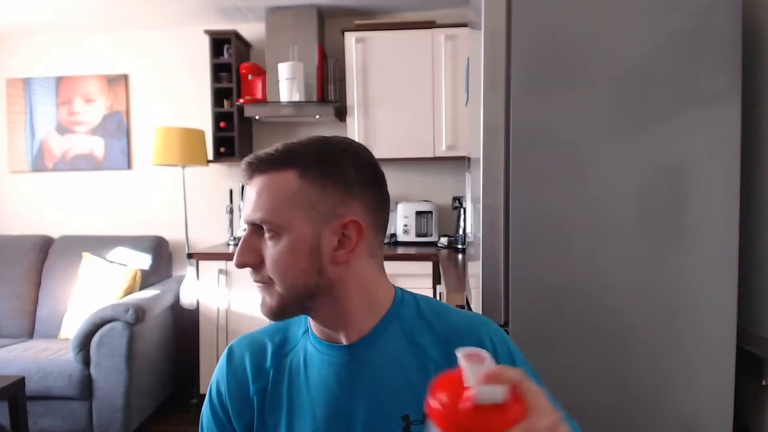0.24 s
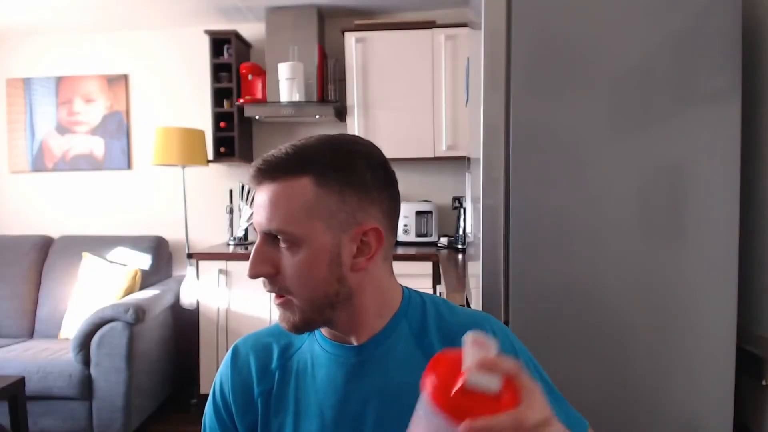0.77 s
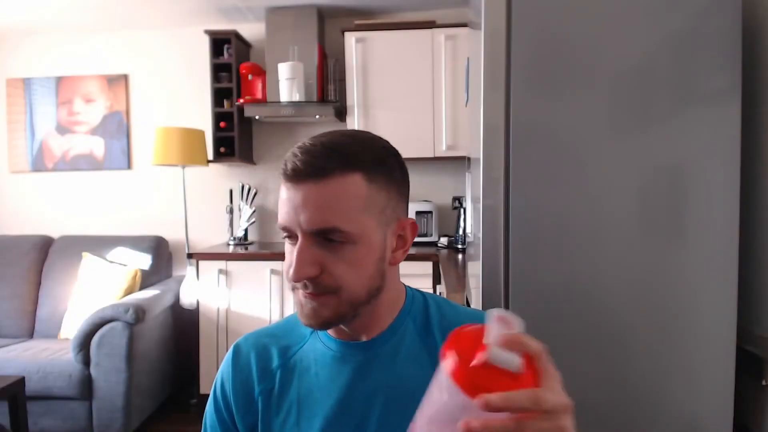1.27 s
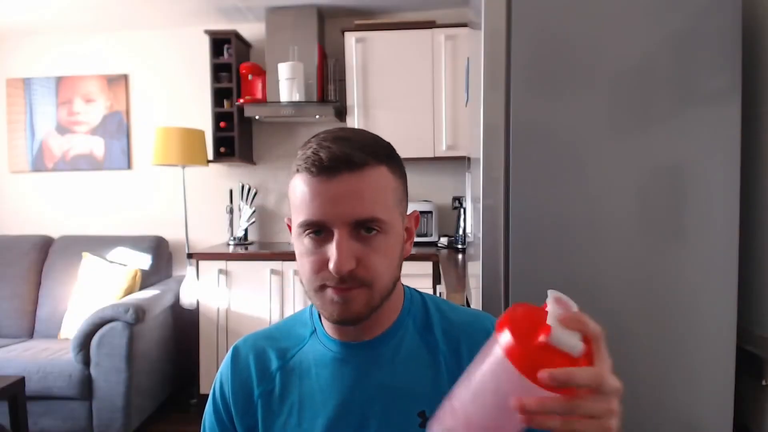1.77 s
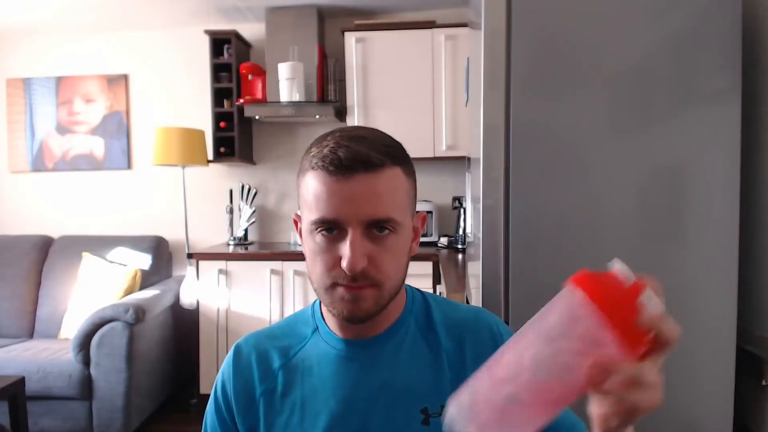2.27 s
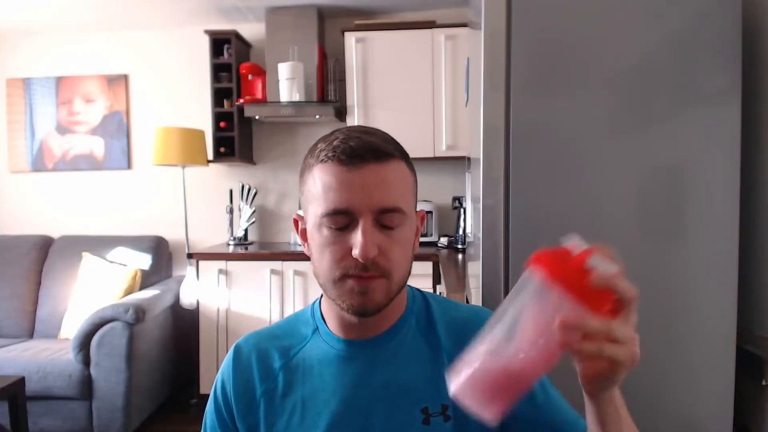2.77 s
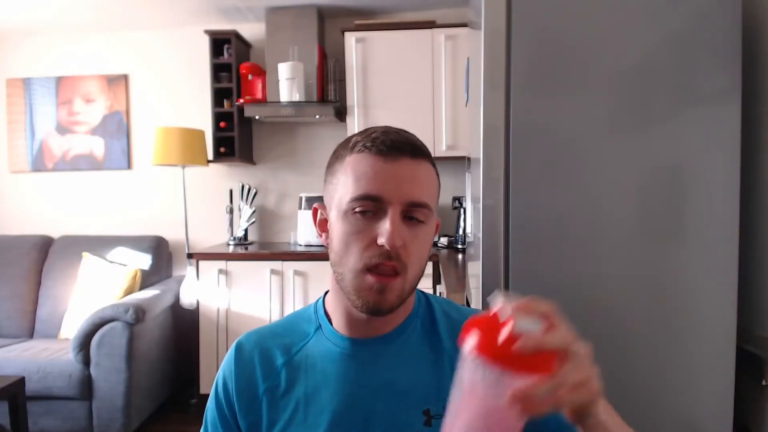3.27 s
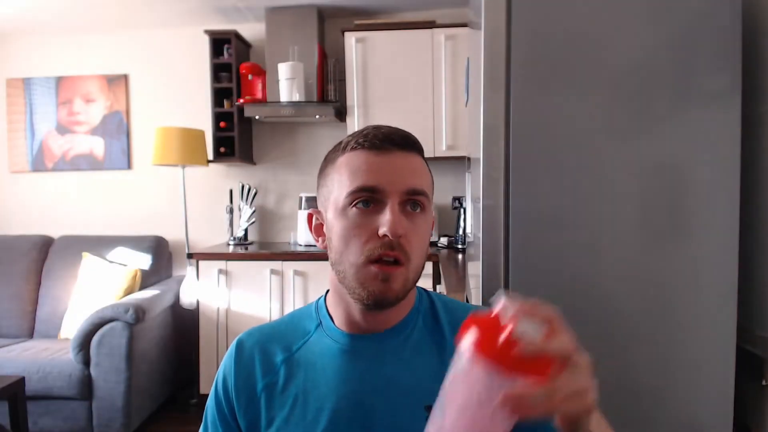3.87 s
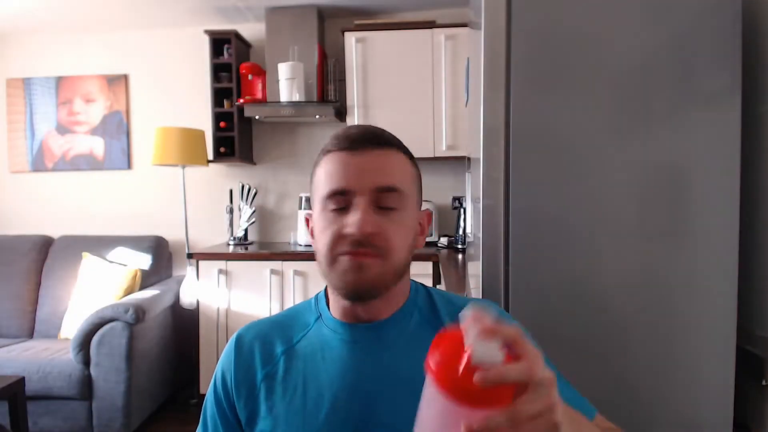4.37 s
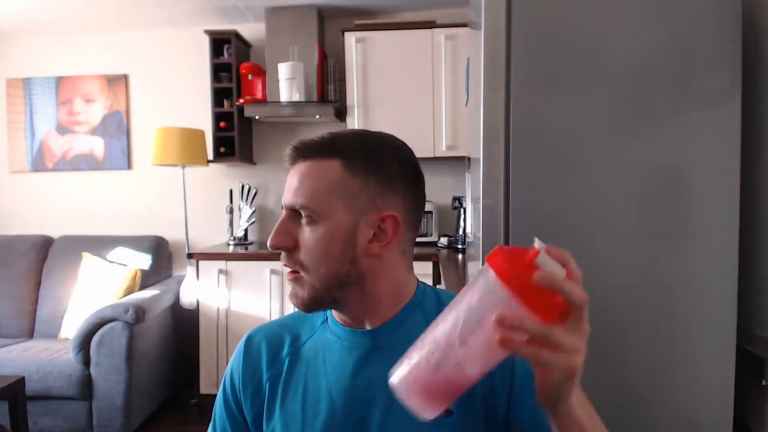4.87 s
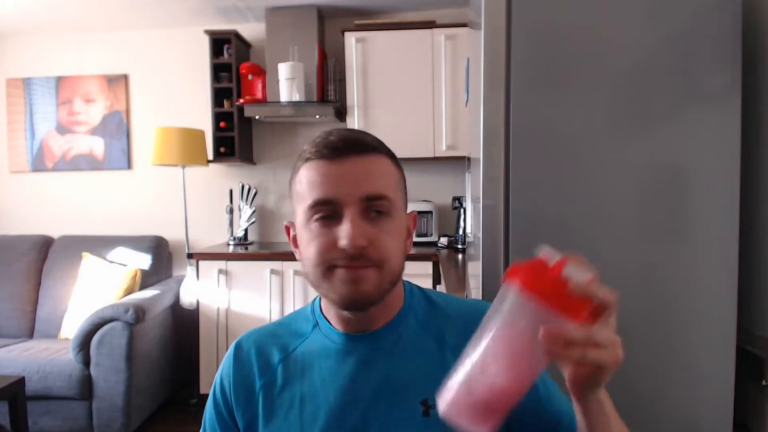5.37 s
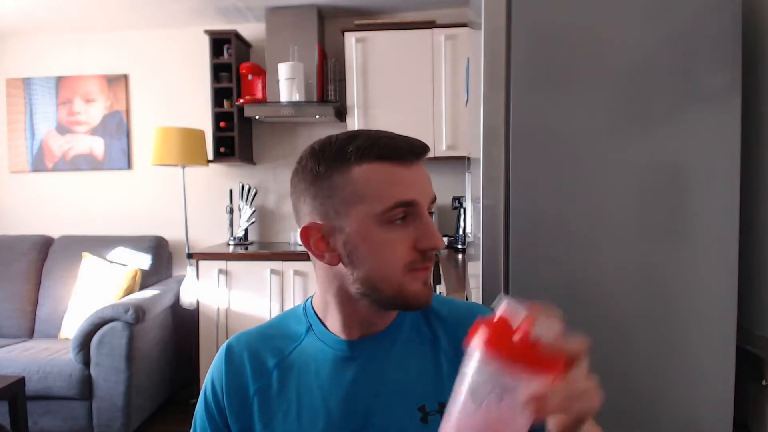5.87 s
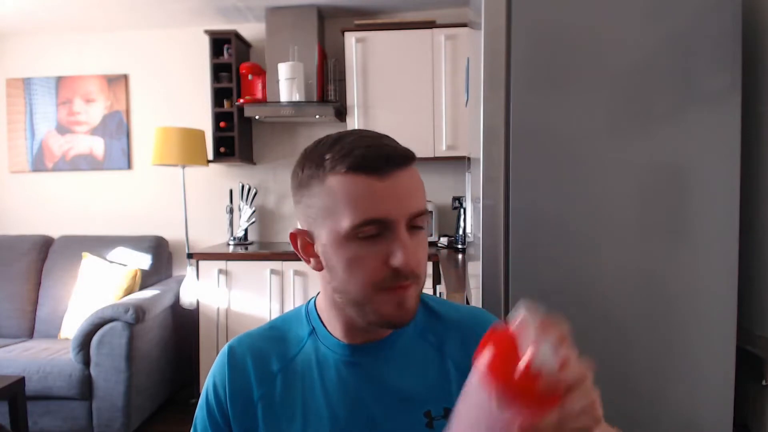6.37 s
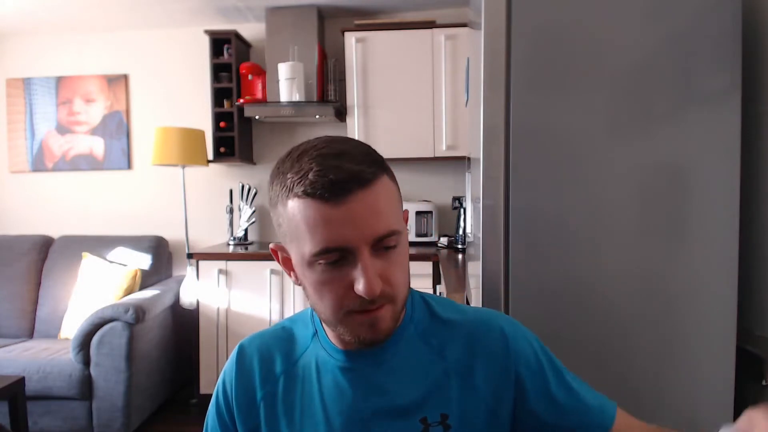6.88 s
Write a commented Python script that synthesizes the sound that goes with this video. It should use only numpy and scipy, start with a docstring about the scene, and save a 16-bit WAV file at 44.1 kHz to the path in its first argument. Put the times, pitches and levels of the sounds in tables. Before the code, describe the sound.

Fast irregular plastic knocks and bright wiry ticks mix with splashing liquid as a hand shakes a bottle indoors, over faint room tone.

```python
"""A plastic bottle half full of liquid is shaken by hand in a furnished room, close to a small microphone.
From the start, filtered noise gives room tone and pushed air, narrow noise an appliance's faint hum, and
droplets and bubbles the churning liquid; its knocking mixer rings damped modes and clicks, with reverberation.
Bright ticks soon join, then single gurgles, thumps of air from abrupt turns of the arm,
and late on a swish of foam from a crowd of bubbles, with one glug of falling tone."""
import sys
import numpy as np
from scipy import signal
from scipy.fft import rfft, irfft, next_fast_len
from scipy.io import wavfile
from scipy.ndimage import map_coordinates

SR = 44100
rng = np.random.default_rng(int(sys.argv[2]) if len(sys.argv) > 2 else 0)


def generate_wav(sig):
    """Save sig (samples, or channels by samples) to the path in sys.argv[1] as 16-bit PCM at SR."""
    pcm = np.round(np.clip(np.atleast_2d(sig).T, -1, 1) * 32767).astype(np.int16)
    wavfile.write(sys.argv[1], SR, pcm)


def to_linear_factor(level_db):
    """Convert decibel levels (scalar or array-like) to linear amplitude factors."""
    exponent = np.asarray(level_db, float) / 20
    return 10 ** exponent


N = 314768  # length [samples]

# colour of the room tone: (frequency [Hz], relative spectral density [dB])
ROOM_TONE_COLOUR = [(40, 29.5), (85, 20.5), (259, 15), (962, -18), (4370, -6), (13600, -48), (16700, -41)]
# narrow hum lines of the appliance: (frequency [Hz], random modulation rate [knots/s], level [dB])
HUM_LINES = [(120, 6, -74), (181.6, 14, -68.5)]
# air pushed by the arm: (time [s], level [dB])
ARM_AIR = [(0, -48), (.65, -46), (2.5, -55), (5.1, -52), (7.14, -56)]
# colour of the pushed air: (frequency [Hz], relative spectral density [dB])
AIR_COLOUR = [(2.4, -79.5), (4.0, 10.5), (19, -4), (29, -7), (70, -34), (91, -44), (150, -120)]
# churning that never settles between surges: (time [s], level [dB])
CHURN = [(0, -36.5), (0.35, -60), (1.4, -54), (2.1, -54), (2.6, -58.5), (3.2, -54), (3.6, -53), (4.1, -53),
         (4.9, -55.5), (6.1, -54.5), (6.6, -61), (7.14, -59)]
CHURN_SPRAY_DB = -5  # spray's part in the churning, relative to the slosh
# liquid thrown against an end of the bottle at each turn of the hand:
# (time [s], slosh level [dB], spray level [dB])
SURGES = [(0.0, -58, -38.5), (0.397, -47, -54), (0.498, -42.5, -51.5), (0.622, -44, -48.5),
          (0.745, -39.5, -45), (0.98, -42.5, -46), (1.087, -42, -47), (1.245, -44.5, -50.5),
          (1.348, -42.5, -59), (1.5, -44, -62.5), (1.619, -44.5, -56), (1.734, -45, -43.5),
          (1.833, -38.5, -47), (2.198, -41.5, -54), (2.353, -49, -49.5), (2.498, -41.5, -44.5),
          (2.65, -73, -50), (2.792, -51.5, -45.5), (2.942, -50, -50.5), (3.107, -45, -47),
          (3.339, -42, -52.5), (3.689, -47, -44.5), (3.954, -40, -44.5), (4.221, -57, -48.5),
          (4.33, -44.5, -47.5), (4.511, -42, -53), (4.828, -51.5, -55), (5.106, -66, -60),
          (5.269, -53.5, -51), (5.353, -41, -48.5), (5.644, -54, -66), (5.921, -48, -64),
          (6.145, -51.5, -45), (6.271, -44, -51), (6.501, -44.5, -55.5), (6.683, -63, -56),
          (6.795, -43, -51.5), (6.9, -49.5, -56), (7.018, -45.5, -47.5)]
# a surge builds up fast, then settles steadily
SURGE_RISE_S, SLOSH_SETTLES_DB_PER_S, SPRAY_SETTLES_DB_PER_S = 0.0037, 103, 107
# colour of the heavy slosh: (frequency [Hz], relative spectral density [dB])
SLOSH_COLOUR = [(120, -39.5), (200, -19), (356, -3.5), (525, -3), (618, -10), (774, 0), (1360, 1),
                (2080, -4.5), (4000, -10.5), (5200, -12), (8800, -39.5)]
# colour of the fine spray: (frequency [Hz], relative spectral density [dB])
SPRAY_COLOUR = [(1500, -12), (2600, -7), (4300, 0), (6000, -9), (7800, -4), (10000, -15.5), (15500, -27.5),
                (16800, -81)]
# reverberation of the room: (frequency [Hz], decay time t60 [s])
ROOM_DECAY = [(200, 0.2), (1500, 0.31), (5000, 0.12), (12000, 0.27)]
# knocks of the mixer on lid, wall and base:
# (time [s], level [dB], relative thud of the whole bottle [dB], relative hard click [dB])
KNOCKS = [(0.008, -24.5, -22, 6.5), (0.096, -19.5, -34, -7), (0.223, -27, -15.5, -12),
          (0.395, -21.5, -40, -6.5), (0.503, -28, -20, -6), (0.623, -26, -17, -11), (0.652, -23, -38, -8.5),
          (0.741, -27.5, -24, -7), (0.762, -23, -17, -2), (0.863, -22, -22.5, -10.5),
          (0.981, -29, -36, -2.5), (1.041, -24.5, -19.5, -10), (1.137, -21, -27, -13.5),
          (1.243, -28.5, -16, -5.5), (1.507, -31, -28, -4.5), (1.619, -18.5, -41, -9),
          (1.734, -19, -42, -6), (1.832, -25, -12, -8.5), (1.968, -21, -30, -13.5), (2.104, -29, -24, -6.5),
          (2.147, -27.5, -47, -8), (2.198, -18.5, -5, -2.5), (2.239, -23.5, -40, -12),
          (2.278, -26, -49, -11.5), (2.494, -28.5, -16.5, -36), (2.51, -22, -23, -9.5),
          (2.569, -24, -29, -19), (2.75, -26.5, -42, -23), (2.792, -15, -11, -8), (2.942, -29, -19, -2.5),
          (3.049, -21.5, -24, -11), (3.106, -18.5, -13, -13), (3.338, -25, -13, -8),
          (3.412, -18, -22, -12.5), (3.689, -10.5, -11.5, -13), (3.954, -16, -18, -10.5),
          (4.221, -19.5, -23.5, -17.5), (4.276, -19, -14, -8.5), (4.51, -13.5, -14, -17),
          (4.837, -30.5, -19, -24), (4.866, -15.5, -27, -18), (5, -25, -31, -14),
          (5.106, -13.5, -17.5, -15.5), (5.357, -32.5, -12, -3), (5.382, -13.5, -23.5, -8),
          (5.644, -25, -32, -10), (5.671, -13, -22, -19), (5.916, -37, -25, -5), (5.973, -20, -15.5, -12.5),
          (6.144, -39.5, -41, 12.5), (6.2, -22, -43, -4), (6.273, -12, -18, -17), (6.511, -24, -1, -8.5),
          (6.683, -33, -17, -7.5), (6.707, -30, -20, -11), (6.796, -18.5, -7, -10),
          (6.938, -29, -11.5, -17), (7.018, -19, -16.5, -10.5), (7.032, -23, -31, -6)]
# vibration modes of the bottle: (frequency [Hz], relative level [dB], decay time t60 [s])
BOTTLE_MODES = [(261, 3, 0.018), (359.3, 12.5, 0.044), (546, 11.5, 0.057), (777, -7.5, 0.072),
                (1048, -2, 0.038), (1289, -4, 0.07), (1401, -8.5, 0.084), (1734, -9, 0.08),
                (1992, -9, 0.046), (2914, -12.5, 0.028), (3280, -11, 0.064), (4240, 1.5, 0.03),
                (4670, 6, 0.023)]
# a small bottle radiates little bass: (frequency [Hz], gain [dB])
RADIATION = [(60, -25), (230, -0.5)]
# colour of the hard clicks: (frequency [Hz], relative spectral density [dB])
CLICK_COLOUR = [(500, -31), (1200, -5.5), (2300, 2.5), (3400, -5), (4500, -5.5), (7000, -10), (10000, -12),
                (15800, -15), (16700, -96)]
# sharp bright ticks of the mixer's wire on the plastic: (time [s], level [dB])
TICKS = [(0.2303, -28), (0.419, -31), (0.57, -33), (0.6743, -28), (0.838, -37), (0.9686, -52),
         (1.0415, -19.5), (1.082, -27), (1.095, -24), (1.12, -31), (1.232, -49), (1.2665, -37),
         (1.319, -31), (1.3465, -28), (1.3629, -23.5), (1.3926, -25), (1.643, -25), (1.8443, -22),
         (1.876, -31), (2.6003, -26.5), (2.772, -25.5), (2.967, -25), (3.482, -32), (3.647, -26),
         (3.761, -29), (3.9874, -39), (4.113, -27), (4.1618, -32), (4.261, -30), (4.3742, -28),
         (4.4302, -28), (4.5324, -19.5), (4.565, -26.5), (4.687, -28), (4.769, -33), (4.94, -34),
         (5.694, -23), (5.888, -33), (5.9993, -32), (6.051, -32), (6.073, -33), (6.0947, -30), (6.331, -20),
         (6.3503, -29), (6.434, -35), (6.565, -29), (6.6177, -37), (6.8667, -30)]
TICK_T60_S, TICK_TAIL_DB, TICK_TAIL_T60_S = 0.0013, -11.5, 0.067
# colour of the ticks: (frequency [Hz], relative spectral density [dB])
TICK_COLOUR = [(700, -19), (2500, 3), (5000, 0.5), (15500, -16), (16700, -68)]
# the clearest single bubbles: (time [s], peak level [dB], frequency [Hz])
GURGLES = [(1.5856, -34.5, 1850), (1.8775, -34, 2860), (2.017, -33.5, 1570), (2.063, -41, 1690),
           (2.608, -35.5, 1820), (4.957, -42, 1850), (5.889, -43, 1860), (6.568, -41, 3280)]
# single thumps of air from abrupt turns of the arm: (time [s], level [dB])
THUMPS = [(2.393, -45), (2.508, -34), (3.35, -40), (5.111, -45), (5.64, -51), (6.209, -39), (6.512, -40)]
THUMP_S = 0.0035  # decay constant of the push
# one long swish of foam: (start [s], end [s], level [dB])
FOAM = (4.28, 4.46, -46.5)
# a swelling pocket of air: (start [s], length [s], first frequency [Hz], last frequency [Hz], level [dB])
GLUG = (4.313, 0.065, 650, 480, -49)


def unit(x):
    """Normalisation: scales a signal to rms 1."""
    return x / np.sqrt(np.mean(x ** 2) + 1e-20)


def curve(points):
    """Linear interpolation: (time, value) points read at every sample."""
    s, value = np.transpose(points)
    return np.interp(np.arange(N) / SR, s, value)


def along(points, hz):
    """Logarithmic frequency scale: (frequency, value) points interpolated along it."""
    f, v = np.transpose(points)
    return np.interp(np.log(hz + 1), np.log(f + 1), v)


def wobble(rate):
    """Band-limited random modulation: a smooth curve through `rate` random knots a second."""
    knots = rng.standard_normal(int(N * rate / SR) + 4)
    return map_coordinates(knots, [np.arange(N) * rate / SR])


def coloured(x, spectrum):
    """Minimum-phase filtering: a causal filter found from its magnitude through the cepstrum."""
    m = 2 * next_fast_len(N // 2 + SR // 4)
    gain = to_linear_factor(along(spectrum, np.fft.rfftfreq(m, 1 / SR)))
    cepstrum = irfft(np.log(gain + 1e-6), m)
    # folding the cepstrum onto positive times makes the filter causal
    cepstrum[1:m // 2] *= 2
    cepstrum[m // 2 + 1:] = 0
    return irfft(rfft(x, m) * np.exp(rfft(cepstrum)), m)[:N]


def background():
    """Superposition of stationary room tone, narrow-band hum, and turbulent and impulsive air pressure."""
    tone = to_linear_factor(-61.5) * unit(coloured(rng.standard_normal(N), ROOM_TONE_COLOUR))
    puff_db = curve(ARM_AIR) + 3.8 * wobble(11.0)
    puffs = to_linear_factor(puff_db) * unit(coloured(rng.standard_normal(N), AIR_COLOUR))
    return tone + hum() + puffs + thumps()


def hum():
    """Quadrature modulation: random sine and cosine amplitudes make each line waver."""
    turn = 2 * np.pi * np.arange(N) / SR
    total = np.zeros(N)
    for hz, rate, db in HUM_LINES:
        line = wobble(rate) * np.sin(hz * turn) + wobble(rate) * np.cos(hz * turn)
        total += to_linear_factor(db) * line
    return total


def liquid():
    """Power addition: churn, surges and splashes drive slaps in the middle range and drops in the treble."""
    _, slosh_db, spray_db = np.transpose(SURGES)
    churn = to_linear_factor(2 * curve(CHURN))
    slosh = churn + surges(slosh_db, SLOSH_SETTLES_DB_PER_S)
    spray = to_linear_factor(2 * CHURN_SPRAY_DB) * churn + surges(spray_db, SPRAY_SETTLES_DB_PER_S)
    flutter = to_linear_factor(2 * 1.8 * wobble(40))  # power factor shared by slosh and spray

    slaps = unit(coloured(droplets(count=1900, spread_db=3.0, life=0.01), SLOSH_COLOUR))
    slaps += to_linear_factor(-4) * bubbles(count=1100, centre_hz=1297.5, spread=0.3976, cycles=3.5)

    drops = unit(coloured(droplets(count=4500, spread_db=3.0, life=0.0025), SPRAY_COLOUR))
    # single drops tick on the lid and the mixer rattles lightly
    drops += to_linear_factor(-4) * unit(coloured(droplets(count=900, spread_db=3.5, life=0.001), CLICK_COLOUR))
    drops += to_linear_factor(-7.0) * bubbles(count=3000, centre_hz=4410, spread=0.218, cycles=5.3)

    heavy = np.sqrt(slosh * flutter + splashes(share_db=-22.5, t60=0.21, bright=0))
    fine = np.sqrt(spray * flutter + splashes(share_db=-9.5, t60=0.068, bright=0.89))
    return heavy * slaps + fine * drops + gurgles()


def surges(level_db, settles_db_per_s):
    """Exponential relaxation: the power of thrown liquid builds up fast, then settles."""
    at = (np.transpose(SURGES)[0] * SR).astype(int)
    starts = np.bincount(at, to_linear_factor(2 * level_db), N)
    settling = signal.lfilter([1], [1, -to_linear_factor(-2 * settles_db_per_s / SR)], starts)
    keep = np.exp(-1 / (SURGE_RISE_S * SR))
    return signal.lfilter([1 - keep], [1, -keep], settling)


def droplets(count, spread_db, life):
    """Shot noise: drops and tongues of liquid strike the wall in random decaying bursts."""
    where = rng.random(count)
    size = np.clip(rng.standard_normal(count), -2, 2)
    starts = np.bincount((where * N).astype(int), to_linear_factor(2 * spread_db * size), N)
    power = signal.lfilter([1], [1, -np.exp(-2 / (life * SR))], starts)
    return unit(np.sqrt(np.abs(power)) * rng.standard_normal(N))


def bubbles(count, centre_hz, spread, cycles):
    """Log-normal population: a random crowd of resonant bubbles around one pitch."""
    where = rng.random(count)
    pitch = rng.standard_normal(count)
    size = to_linear_factor(2.1 * np.tanh(rng.standard_normal(count)))
    hz = centre_hz * np.exp(spread * pitch)
    return unit(chirps(where * N, size, hz, cycles, rise=0.00934))


def chirps(at, size, hz, cycles, rise):
    """Bubble resonance: trapped air sounds short damped tones that start softly and rise in pitch."""
    k = np.arange(700)
    turns = hz[:, None] * k / SR
    envelope = turns / cycles * np.exp(1 - turns / cycles)  # peaks at 1 after `cycles` turns
    tones = size[:, None] * envelope * np.sin(2 * np.pi * turns * (1 + rise * turns))
    where = at.astype(int)[:, None] + k
    return np.bincount(where.ravel(), tones.ravel(), N + len(k))[:N]


def splashes(share_db, t60, bright):
    """Exponential decay: the power of liquid thrown up by each knock jumps at once and settles."""
    s, db, _, click_db = np.transpose(KNOCKS)
    level_db = db + bright * click_db + share_db
    starts = np.bincount((s * SR).astype(int), to_linear_factor(2 * level_db), N)
    return signal.lfilter([1], [1, -to_linear_factor(-120 / (t60 * SR))], starts)


def room(x):
    """Diffuse reverberation: decaying noise tails, a new one every quarter second as the bottle moves."""
    step, delay = SR // 4, 200  # [samples]
    out = np.zeros(N + 2 * SR)
    for at in range(0, N, step):
        hz, t, z = signal.stft(rng.standard_normal(SR // 2), SR, nperseg=256)
        decay = to_linear_factor(-60 * t / along(ROOM_DECAY, hz)[:, None])
        tail = signal.istft(z * decay, SR, nperseg=256)[1]
        wet = signal.fftconvolve(x[at:at + step], tail / np.linalg.norm(tail))
        out[at + delay:at + delay + len(wet)] += wet
    return out[:N]


def knocks():
    """Modal excitation: each contact rings the bottle's damped modes at new strengths and clicks."""
    t = np.arange(SR // 8) / SR
    hz, level, t60 = np.transpose(BOTTLE_MODES)[:, :, None]
    count = len(BOTTLE_MODES)
    ring, click = np.zeros(N + SR), np.zeros(N + SR)
    for s, db, thud_db, click_db in KNOCKS:
        strength, detune, start = rng.standard_normal((3, count, 1))
        # low modes follow the thud, high modes the hardness of the contact
        reach_db = np.where(hz < 650, thud_db, np.where(hz > 3500, click_db, 0))
        # the liquid's position loads the wall and detunes the modes; its motion blurs their phase
        drift = np.cumsum(rng.standard_normal((count, len(t))), axis=1)
        blur = 0.09 * np.sqrt(hz / hz.mean()) * drift
        phase = 2 * np.pi * hz * (1 + 0.033 * detune) * t + 0.66 * start + blur
        modes = to_linear_factor(level + reach_db + 1.4 * strength - 60 * t / t60) * np.sin(phase)
        onset = 1 - np.exp(-t / 0.0012)
        at = round(s * SR)
        ring[at:at + len(t)] += to_linear_factor(db - 9.0) * onset * modes.sum(0)
        burst = to_linear_factor(-60 * t / 0.027) * rng.standard_normal(len(t))
        click[at:at + len(t)] += to_linear_factor(db + click_db) * burst
        click[at] += to_linear_factor(db + click_db + 13)  # the sharp first contact
    scale = np.std(coloured(rng.standard_normal(N), CLICK_COLOUR))
    clicks = coloured(click[:N], CLICK_COLOUR) / scale
    return coloured(ring[:N], RADIATION) + to_linear_factor(-5.5) * clicks


def ticks():
    """Impulsive contact: each tick is a very short broadband crack with a faint tail."""
    t = np.arange(SR // 40) / SR
    s, db = np.transpose(TICKS)
    decay = to_linear_factor(-60 * t / TICK_T60_S) + to_linear_factor(TICK_TAIL_DB - 60 * t / TICK_TAIL_T60_S)
    cracks = decay * rng.standard_normal((len(s), len(t)))
    cracks *= to_linear_factor(db)[:, None] / np.abs(cracks).max(axis=1, keepdims=True)
    at = (s * SR).astype(int)[:, None] + np.arange(len(t))
    train = np.bincount(at.ravel(), cracks.ravel(), N + len(t))[:N]
    return coloured(train, TICK_COLOUR) / np.std(coloured(rng.standard_normal(N), TICK_COLOUR))


def gurgles():
    """Isolated bubble resonance: the clearest bubbles sound one by one."""
    s, db, hz = np.transpose(GURGLES)
    return chirps(s * SR, to_linear_factor(db), hz, cycles=3.2, rise=0.0011)


def thumps():
    """Zero-mean pressure pulse: a pointed push of air between two shallow dips of equal total area."""
    u = np.abs(np.arange(-2000, 2001)) / (THUMP_S * SR)
    push = np.exp(-u) - np.exp(-u * u / 32) / np.sqrt(8 * np.pi)
    s, db = np.transpose(THUMPS)
    starts = np.bincount((s * SR).astype(int), to_linear_factor(db), N)
    return signal.fftconvolve(starts, push, "same")


def foam():
    """Incoherent summation: a dense crowd of tiny bubbles bursts through one long swish."""
    start, end, db = FOAM
    t = np.arange(N) / SR
    swell = np.clip(np.minimum(t - start, end - t) / 0.013, 0, 1)
    return to_linear_factor(db) * swell * bubbles(count=12000, centre_hz=4620, spread=0.235, cycles=2.7)


def glug():
    """Cavity resonance: a pocket of air swells and its tone falls, growing and fading once."""
    start, length, from_hz, to_hz, db = GLUG
    u = np.clip((np.arange(N) / SR - start) / length, 0, 1)
    turns = length * (from_hz * u + (to_hz - from_hz) * u * u / 2)
    return to_linear_factor(db + 3 * wobble(68)) * np.sin(np.pi * u) * np.sin(2 * np.pi * turns)


def scene():
    """Linear superposition: the bottle's direct sound, its reverberation and the background."""
    bottle = liquid() + knocks() + ticks() + foam() + glug()
    return (bottle + to_linear_factor(-12.0) * room(bottle) + background())[None]


def roll_off(x):
    """The treble ends steeply here."""
    return signal.sosfilt(signal.butter(12, 16820, fs=SR, output="sos"), x)


def record(dry):
    """Signal chain: the finished mix goes through its last stage."""
    return roll_off(dry)


dry = scene()
out = record(dry)
generate_wav(out)
```